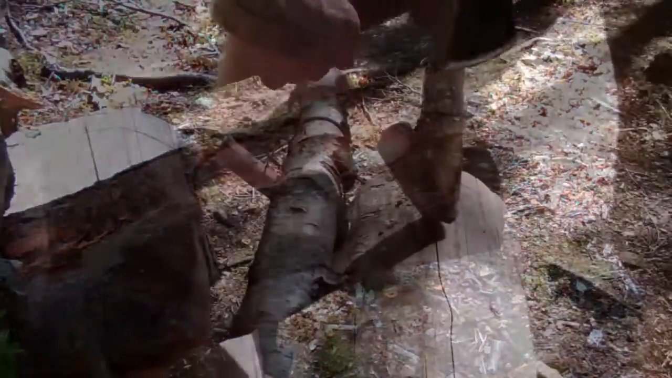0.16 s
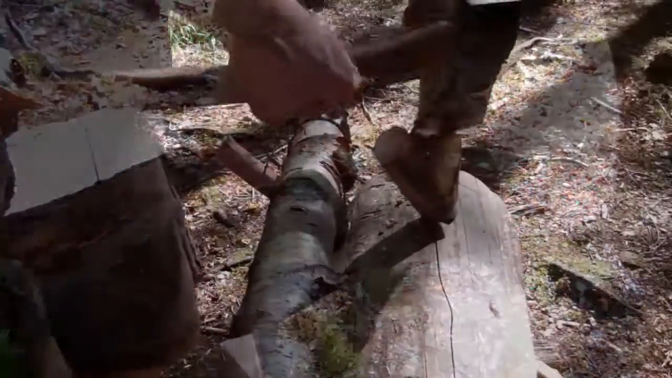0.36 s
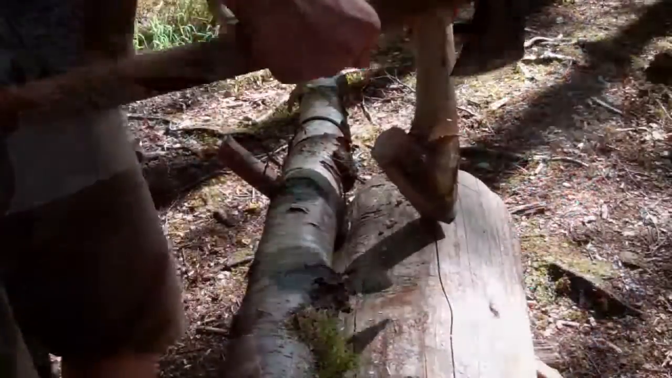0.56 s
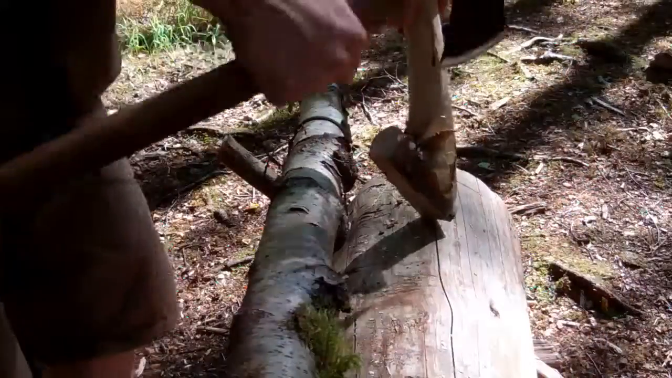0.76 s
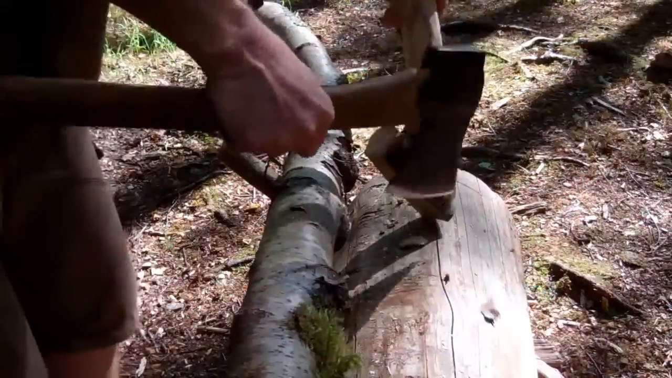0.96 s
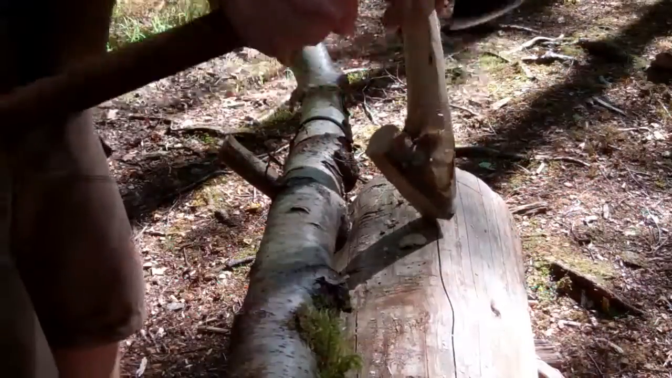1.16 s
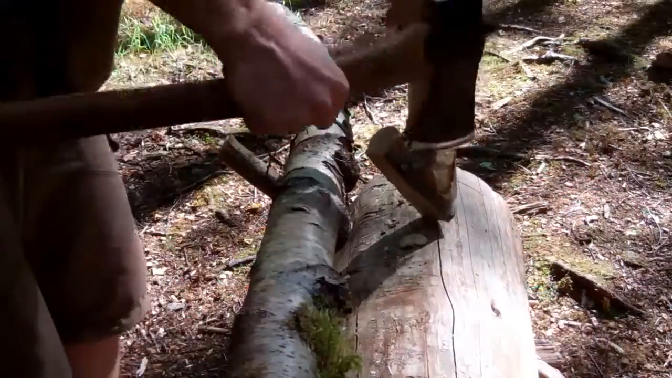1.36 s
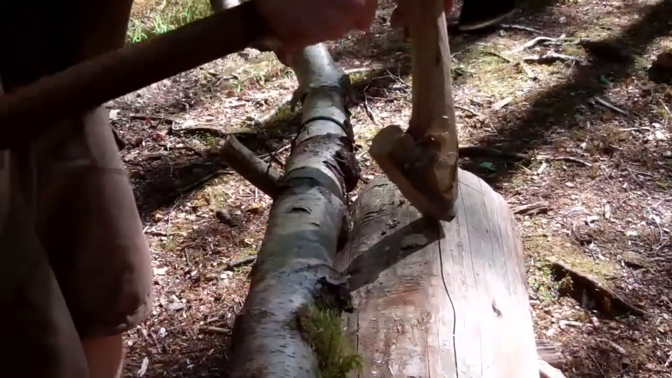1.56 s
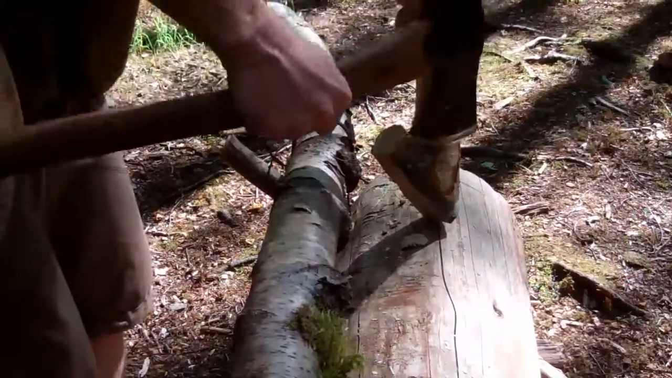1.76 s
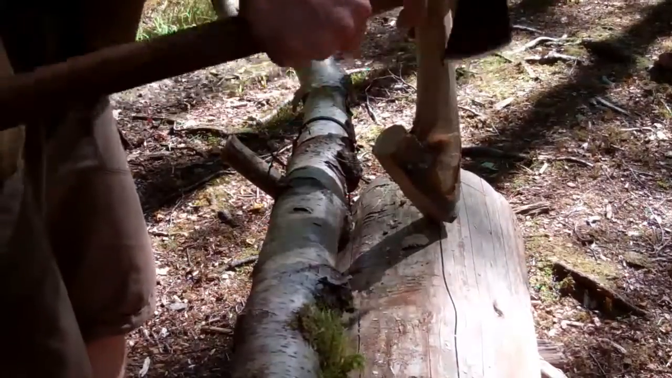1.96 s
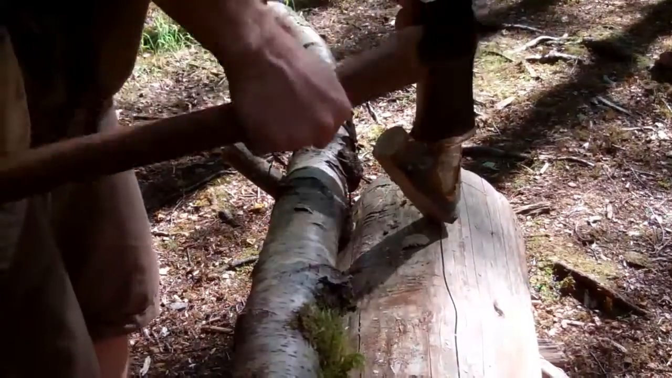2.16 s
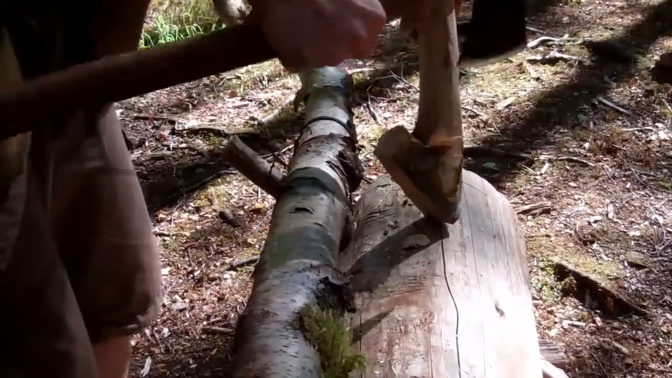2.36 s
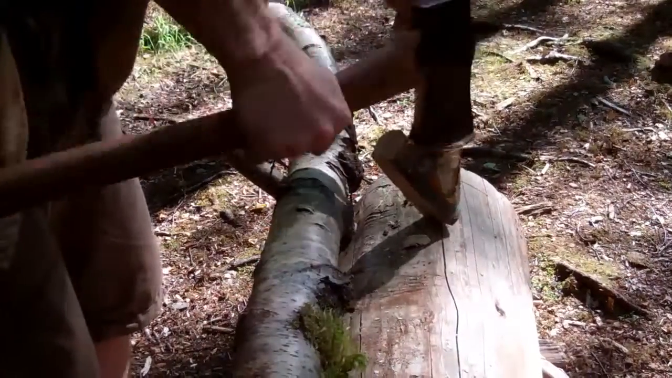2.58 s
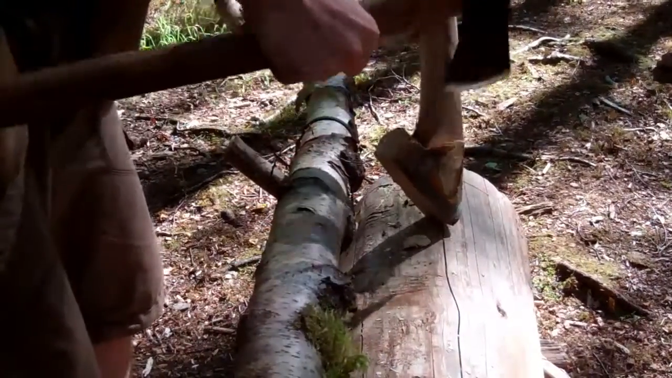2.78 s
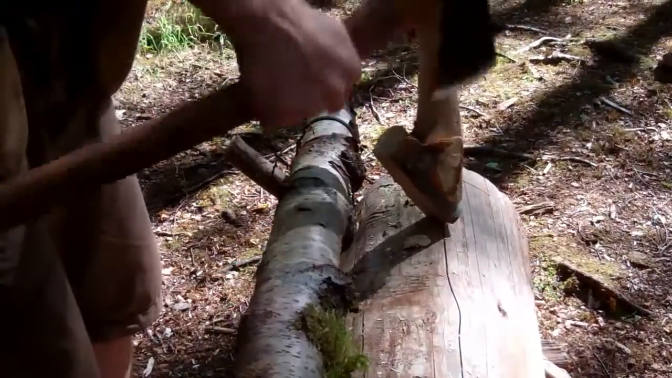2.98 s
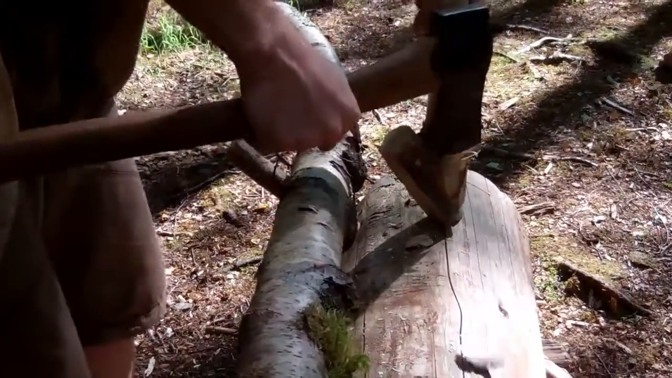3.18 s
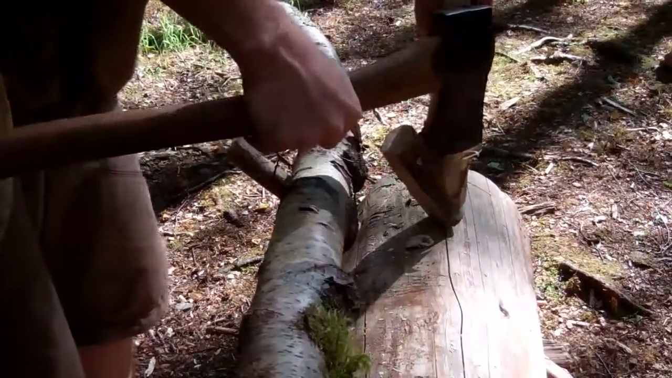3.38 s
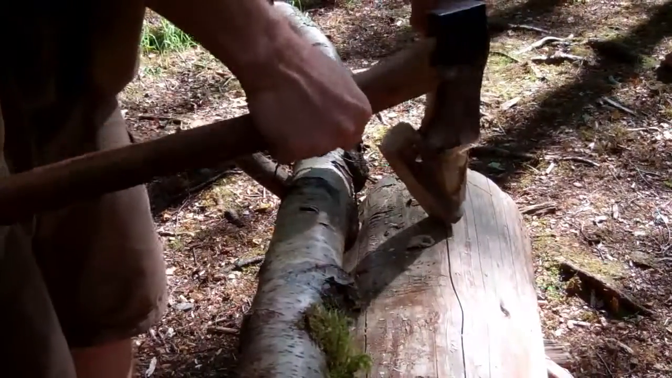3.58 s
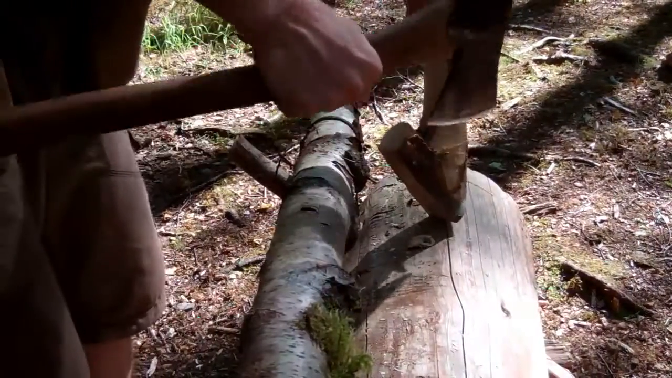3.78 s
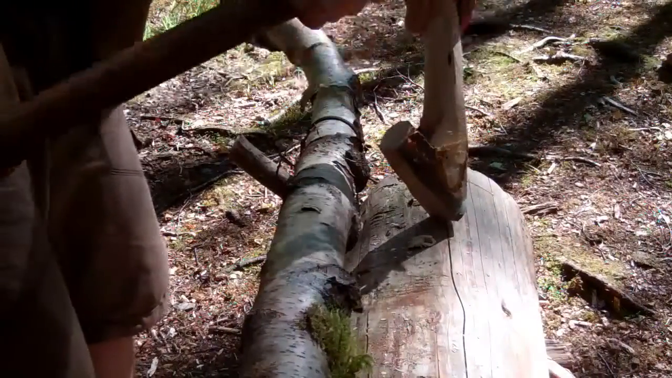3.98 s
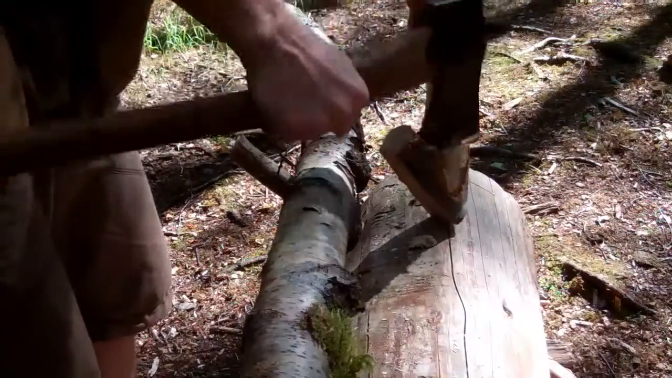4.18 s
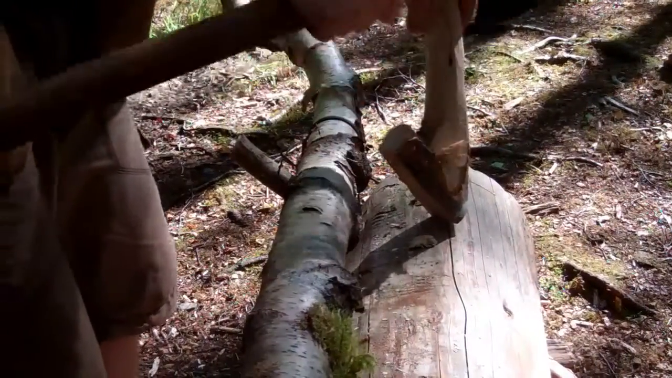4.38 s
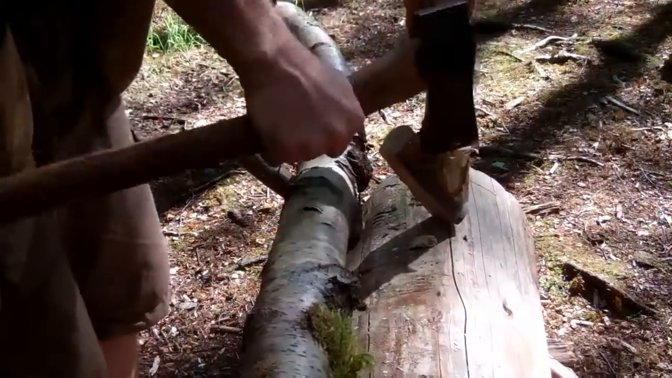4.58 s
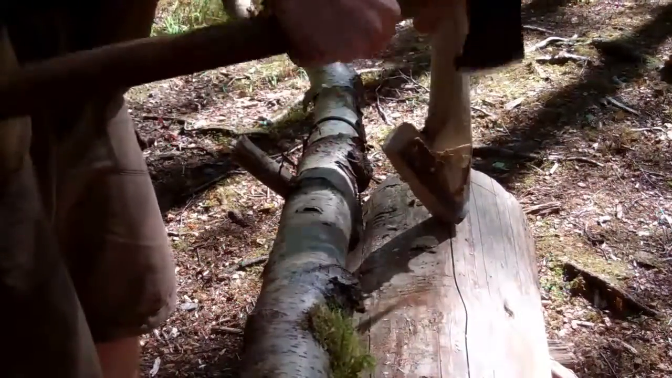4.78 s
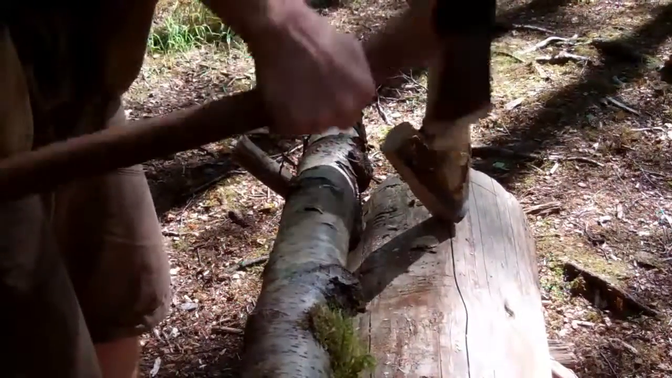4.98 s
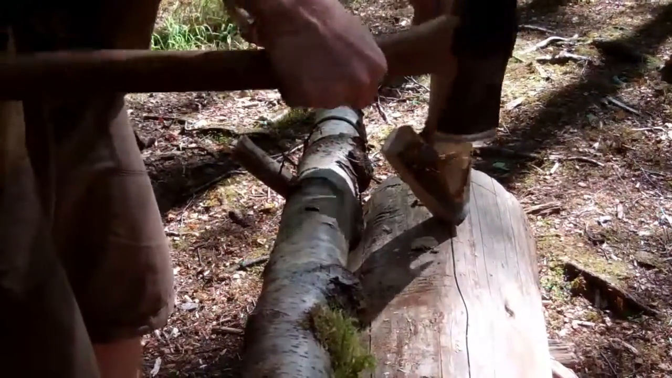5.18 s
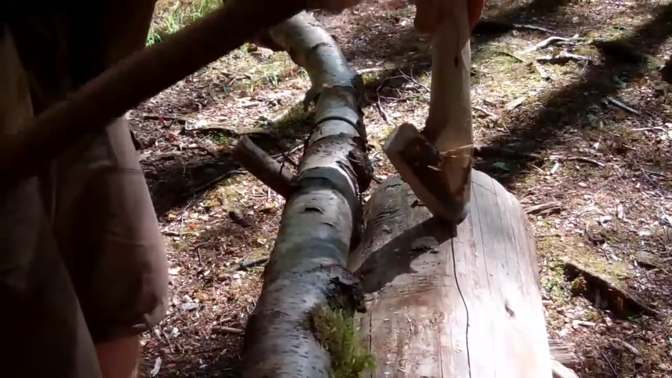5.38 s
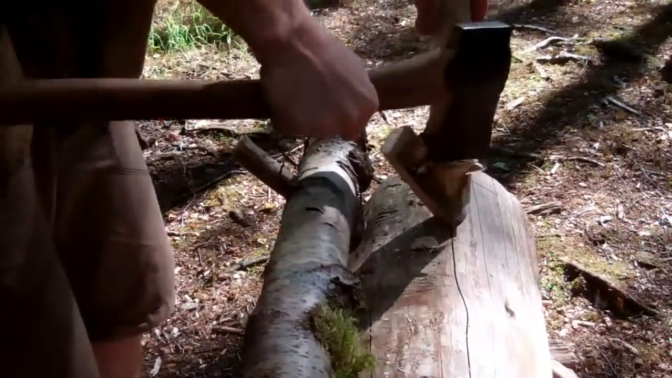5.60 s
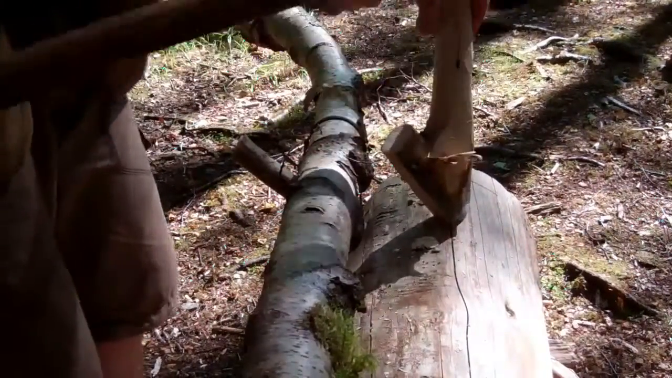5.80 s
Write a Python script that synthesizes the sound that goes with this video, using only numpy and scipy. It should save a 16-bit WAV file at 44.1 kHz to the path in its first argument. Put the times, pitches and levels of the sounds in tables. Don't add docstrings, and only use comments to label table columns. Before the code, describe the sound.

The back of an axe head drives a wooden handle standing on a log, close and slightly left of a stereo microphone. Softer first hits grow into hard dry cracks about every half second, with one longer gap midway. Each has a clipped woody ring and low thud; tiny chips tick between. Soft leaf hiss sinks after blows and swells back.

```python
import sys
import numpy as np
from scipy import signal
from scipy.fft import irfft
from scipy.io import wavfile
from scipy.ndimage import uniform_filter1d

SR = 44100
rng = np.random.default_rng(int(sys.argv[2]) if len(sys.argv) > 2 else 0)


def to_wav(sig):
    pcm = np.clip(np.atleast_2d(sig), -1, 1) * 32767
    pcm = np.round(pcm).astype(np.int16)
    wavfile.write(sys.argv[1], SR, pcm.T)


def volts(x):
    e = np.asarray(x, float) / 20
    return 10 ** e


N = 257544


def evened(x):
    return x / np.sqrt(np.mean(x ** 2) + 1e-20)


def read(points, hz):
    f, value = np.transpose(points)
    return np.interp(np.log(hz + 1), np.log(f + 1), value)


def add(mix, s, sound):
    part = mix[round(s * SR):][:len(sound)]
    part += sound[:len(part)]


def resonate(x, hz, width):
    turn = np.exp(2j * np.pi * np.cumsum(hz * np.ones(len(x))) / SR)
    r = np.exp(-np.pi * width / SR)
    return 2 * (turn * signal.lfilter([1 - r], [1, -r], x / turn)).real


def rise(t, rise_s):
    return np.minimum(t / rise_s, 1)


def ring(t, hz, db, t60):
    return volts(db - 60 * t / max(t60, .001)) * np.sin(2 * np.pi * hz * t)


def burst(db, hz, t60, width, grit_db, rise_s):
    t = np.arange(3000) / SR
    grit = rng.standard_normal(3000) * volts(grit_db * rng.standard_normal(3000))
    fall = volts(db - 60 * t / max(t60, .002)) * rise(t, rise_s)
    return evened(resonate(resonate(grit, hz, width), hz, width)) * fall


# time in seconds, strength in dB
BREEZE = [(0, 2.5), (.12, 4.5), (0.301, 2.5), (.47, 0.5), (0.601, 4.5), (.69, 1.5), (0.82, 3), (1.1, 0),
          (1.3, 1), (1.598, 0.5), (2.5, .5), (3.299, 1), (3.44, 1.5), (3.53, 2), (3.62, 1), (3.76, 2.5),
          (3.9, .5), (4.08, 1), (4.5, 0), (5.83, 0.5)]


def breeze_db():
    return np.interp(np.arange(N) / SR, *np.transpose(BREEZE))


# free ringing in seconds, gain control depth in dB, sinking time in seconds
AFTER_BLOW = [(0.009, 5.5, 0.086), (0.0035, 4.5, 0.28), (0.0017, 20, 0.15), (0.0036, 12.5, 0.13),
              (0.0069, 10.5, 0.17), (0.012, 14, .135), (0.0038, 12, 0.15), (0.0028, 22.5, 0.17),
              (0.0042, 10.5, .157), (0.0073, 19.5, 0.16), (0.0016, 13, .115), (0.0076, 20, 0.16)]


def ducking_db():
    recover_s, sink_curve = 0.15, 0.65
    t, out = np.arange(N) / SR, np.zeros(N)
    for (s, *_), (_, depth_db, sink_s) in zip(BLOWS, AFTER_BLOW):
        sink = (t / sink_s) ** sink_curve
        climb = np.exp(np.minimum(sink_s - t, 0) / recover_s)
        add(out, s, -depth_db * np.minimum(sink, climb))
    return uniform_filter1d(out, size=1300)


# frequency in Hz, density in dB per Hz
FOREST_SPECTRUM = [(41, -28), (70, -1.5), (300, -5), (850, -3.5), (1600, -8), (8090, -17.5), (11500, -25.5),
                   (16000, -61)]
# frequency in Hz, share from 0 to 1
FOREST_LIKENESS = [(60, 0.19), (950, 0.4), (15000, 0.033)]
# frequency in Hz, left over right in dB
FOREST_PAN = [(60, 4), (240, 4), (950, 3.0), (3770, 3.5), (15000, 6)]


def forest():
    rest_db, whine_hz, whine_db = -60, 7865, -18
    rustle_per_db, rustle_ducked = 1.45, -0.025
    air_hz, air_per_db, air_rest_db = 10500, 5, 1.3
    frames, hz = N // 128 + 9, np.fft.rfftfreq(512, 1 / SR)
    breeze, ducked = breeze_db(), ducking_db()
    at = np.minimum(np.arange(frames) * 128, N - 1)
    a, b, c, d, patches = rng.standard_normal((frames, 257, 5)).T
    patches = evened(uniform_filter1d(uniform_filter1d(patches, 6, 0), 16, 1))
    flicker = evened(uniform_filter1d(rng.standard_normal(frames), 3))
    treble = np.clip(np.log2((hz + 1) / 2000), 0, 1)[:, None]
    rustle = treble * (rustle_per_db * breeze - rustle_ducked * ducked)[at]
    air = np.clip(np.log2((hz + 1) / air_hz), 0, 1)[:, None]
    hiss = air * air_per_db * (breeze[at] - air_rest_db)
    same = np.clip(read(FOREST_LIKENESS, hz), -1, 1)[:, None]
    left = a + 1j * b
    right = same * left + np.sqrt(1 - same ** 2) * (c + 1j * d)
    level_db = read(FOREST_SPECTRUM, hz)[:, None] + 2.0 * patches + 1.1 * flicker + rustle + hiss
    z = np.array([left, right]) * volts(level_db)
    z *= volts(np.outer([.5, -.5], read(FOREST_PAN, hz)))[:, :, None]
    wash = evened(signal.istft(z, nperseg=512, noverlap=384)[1][:, :N])
    whine = np.array([evened(resonate(row, whine_hz, 40)) for row in rng.standard_normal((2, N))])
    return volts(rest_db + 3 + breeze + ducked) * (wash + volts(whine_db) * whine)


# start and end in seconds, start and end pitch in Hz, level in dB, width in Hz
BIRDS = [
    (1.155, 1.345, 8640, 8480, -66.5, 90),
    (1.175, 1.335, 7630, 7540, -68, 130),
    (3.66, 3.81, 1960, 1890, -63.5, 110),
    (1.6, 1.73, 1850, 1880, -73, 110),
]


def birds():
    arch, blur = .006, .8
    out = np.zeros(N)
    for s, end, hz, end_hz, db, width in BIRDS:
        size = round((end - s) * SR)
        swell = np.sin(np.linspace(0, np.pi, size))
        glide = np.linspace(hz, end_hz, size) * (1 - arch + arch * swell)
        breath = evened(resonate(rng.standard_normal(size), glide, width))
        note = blur * breath + np.sin(2 * np.pi * np.cumsum(glide) / SR)
        add(out, s, volts(db) * evened(note) * np.sqrt(swell))
    return out


# time in seconds, boom in dB, boom pitch in Hz, shake in dB
SHAKES = [(0.333, -36.5, 280, -46), (0.854, -36.5, 251, -68), (1.352, -31.5, 410, -52),
          (1.755, -25.5, 194, -46), (2.169, -30.5, 321, -52), (2.61, -24.5, 221.3, -47.5),
          (3.05, -36.5, 231, -60), (4.127, -23.5, 290, -51.5), (4.59, -42.5, 290, -68),
          (5.039, -46, 118, -57), (5.513, -34.5, 228, -69)]


def shakes():
    out, t = np.zeros(N), np.arange(9000) / SR
    for s, _, _, db in SHAKES:
        add(out, s + 0.0078, ring(t, 47 * rng.uniform(.92, 0.94), db, 0.2) * rise(t, 0.014))
    noise = rng.standard_normal((2, N))
    rumble = np.array([evened(resonate(resonate(row, 46, 35), 46, 35)) for row in noise])
    return out + volts(-71.5 + 1.2 * ducking_db()) * rumble


# frequency in Hz, 60 dB decay in seconds
TRUNKS = [(200, 0.27), (2000, 0.13), (12000, 0.05)]


def trunks(x):
    taps = np.zeros((2, 16000))
    at = np.arange(300, 15960, 20) + rng.integers(0, 20, (2, 783))
    np.put_along_axis(taps, at, rng.choice([-1., 1.], at.shape), 1)
    hz, t, z = signal.stft(taps, SR, nperseg=256)
    tail = signal.istft(z * volts(-60 * t / read(TRUNKS, hz)[:, None]), SR, nperseg=256)[1]
    return signal.fftconvolve(x[None], tail / np.linalg.norm(tail[0]), axes=1)[:, :N]


def tick(db, hz, treble_db, treble_hz):
    t = np.arange(3000) / SR
    blip = ring(t, hz, db - 1.5, min(.016, .014 * (1400 / hz) ** 2)) * rise(t, .0006)
    body = ring(t, .5 * hz, db - 16.5, 0.012)
    tap = burst(.5 * (db + treble_db) - 4.5, 2000, 0.05, 4100, 1.9, 0.00082)
    puff = burst(treble_db + 2.5, treble_hz, 0.016, 6000, 2.0, 0.0016)
    return blip + body + tap + puff


# time in seconds, near echoes in dB, far echo in dB
ECHOED = [(0.342, -56, -40), (1.346, -51.5, -60), (1.757, -42, -57), (2.173, -47, -52), (2.612, -46, -38),
          (3.053, -57, -41.5), (4.133, -46, -46), (4.596, -55, -43), (5.042, -58, -36), (5.521, -65, -41)]
# level in dB, pitch in Hz, treble in dB, treble pitch in Hz
NEAR_TRUNKS = [
    (-4, 780, 0.5, 8800),
    (-4, 1470, -9.5, 8600),
    (-9, 1190, -16.5, 4000),
]
# level in dB, pitch in Hz, treble in dB, treble pitch in Hz
FAR_TRUNK = (-9, 1262, -13.5, 5495)
TRUNK_DELAYS = [.032, .075, .123, .245]


def trunk_echoes():
    out = np.zeros(N)
    for s, near_db, far_db in ECHOED:
        levels = [near_db, near_db, near_db, far_db]
        for delay, level_db, trunk in zip(TRUNK_DELAYS, levels, NEAR_TRUNKS + [FAR_TRUNK]):
            db, hz, treble_db, treble_hz = trunk
            add(out, s + delay, tick(level_db + db, hz, level_db + treble_db, treble_hz))
    return out


# time in seconds, peak in dB, pitch in Hz, treble in dB
CHIPS = [(0.104, -37, 3300, -52), (0.111, -50, 1950, -45.5), (0.425, -33.5, 1970, -73),
         (0.9189, -69, 2350, -52), (0.949, -48, 1980, -67), (1.485, -65, 3000, -58), (1.685, -54, 920, -62),
         (.462, -43, 1910, -75), (1.913, -57, 1460, -68), (2.214, -58, 3450, -48), (2.28, -50, 2120, -88),
         (2.436, -56, 2690, -47.5), (2.679, -40.5, 2050, -65), (2.695, -46, 2030, -70),
         (2.72, -50, 2070, -90), (2.842, -44, 1950, -73), (2.965, -51, 1240, -70), (3.116, -53, 977, -68),
         (3.243, -68, 2950, -56.5), (3.283, -52, 1800, -74), (3.57, -65, 950, -49.5),
         (3.724, -59, 1880, -55), (3.755, -62, 3300, -50), (4.194, -43.5, 2000, -60),
         (4.288, -54, 1510, -64), (4.651, -56, 2360, -63), (5.1, -44, 2160, -63), (5.151, -51, 2180, -78),
         (5.188, -46, 2000, -74), (5.571, -62, 1500, -66)]


def chips():
    out = np.zeros(N)
    for s, *row in CHIPS:
        add(out, s, tick(*row, 6800))
    return out


# time in seconds, level in dB, pitch in Hz
SPLINTERS = [(.374, -52.5, 2800), (.394, -49, 1500), (1.068, -63.5, 7000), (1.131, -65.5, 8500),
             (1.422, -54, 2800), (1.423, -69, 4500), (1.447, -74, 1200), (1.718, -49, 5470),
             (1.816, -56, 1600), (1.856, -63, 1500), (2.001, -62, 1300), (2.241, -58, 2000),
             (2.269, -59, 1300), (2.269, -67, 5500), (2.318, -58, 7500), (2.324, -56.5, 7500),
             (2.343, -65, 1000), (2.417, -56, 1000), (2.709, -58.5, 1500), (2.708, -69, 5000),
             (2.857, -45, 785), (3.063, -47, 9500), (3.136, -65, 1980), (3.16, -65, 2030),
             (3.209, -68, 1960), (3.424, -55.5, 7000), (3.503, -58, 4500), (3.778, -53, 4970),
             (4.164, -62, 4500), (4.189, -57, 4500), (4.227, -58, 1600), (4.238, -63, 1800),
             (4.658, -62.5, 1490), (4.689, -62.5, 1000), (4.701, -64, 1990), (4.741, -75, 8500),
             (4.748, -71, 8200), (4.749, -71, 2800), (5.096, -58, 8000), (5.1, -56, 2800),
             (5.124, -58, 1990), (5.176, -54, 2000), (5.213, -61, 8000), (5.286, -48, 1300),
             (5.572, -72, 8200), (5.581, -64, 1210), (5.627, -63, 2000), (5.643, -70, 4470),
             (5.665, -67.5, 2006), (5.697, -68, 1000)]


def splinters():
    out = np.zeros(N)
    for s, db, hz in SPLINTERS:
        add(out, s, burst(db + 2.5, hz, 0.014, 0.69 * hz, 1.2, 0.00098))
    return out


def booms():
    out, t = np.zeros(N), np.arange(7000) / SR
    for s, db, hz, _ in SHAKES:
        beat = 1 + 0.14 * np.cos(2 * np.pi * 0.22 * hz * t)
        add(out, s, ring(t, hz, db + 0.5, 0.035) * beat * rise(t, 0.0058))
    return out


# frequency in Hz, level in dB, 60 dB decay in seconds
LOG_MODES = [(400, -0.5, 0.0028), (520, -14.5, 0.043), (594.4, 0, 0.033), (780, 2.5, 0.031),
             (1053, 6.5, 0.031), (1171, -3, 0.024), (1368, 5.5, 0.051)]


def thud(db, hz, t60):
    t, body = np.arange(3000) / SR, 0
    for f, d, s in LOG_MODES:
        near_db = d - 14 * np.log2(f / hz) ** 2
        body = body + ring(t, f * rng.uniform(0.92, 1.02), near_db, s * t60 / 0.032)
    push = burst(db - 6.5, hz, 0.76 * t60, 1.0 * hz, 8.2, 0.00011)
    return push + volts(db - 2.5) * body * rise(t, 0.001)


# time in seconds, level in dB, pitch in Hz, 60 dB decay in seconds
THUDS = [(.331, -39, 700, 0.057), (.336, -59, 790, 0.046), (.851, -44.5, 800, 0.036),
         (.86, -47, 826, 0.017), (1.35, -40.5, 700, 0.06), (1.354, -56, 553, 0.046),
         (1.758, -35, 620, 0.014), (1.7615, -30, 566, 0.035), (2.1726, -25.5, 443, 0.029),
         (2.612, -31.5, 700, 0.051), (2.616, -38, 700, 0.03), (3.051, -36, 520, 0.03),
         (4.1268, -27, 580, .025), (4.1333, -29.5, 490, 0.032), (4.591, -23, 637, 0.023),
         (4.597, -35, 594, 0.029), (5.039, -42, 670, 0.025), (5.511, -27.5, 822, 0.014),
         (5.516, -38, 502, 0.033)]


def thuds():
    out = np.zeros(N)
    for s, *row in THUDS:
        add(out, s, thud(*row))
    return out


# time in seconds, pitch in Hz,
# level in dB, 60 dB decay in seconds
RINGS = [(.331, 660, -27, .033), (.853, 5200, -26, .022), (.875, 5400, -44, .08), (.8911, 2420, -33.5, .02),
         (.925, 5400, -69, .15), (.94, 11350, -75, .2), (1.348, 680, -29, .015), (1.747, 5620, -29, .034),
         (3.047, 1163, -24.5, .0073), (4.1268, 660, -18.5, .011), (5.035, 1795, -14.5, .013),
         (.921, 2400, -60, .17), (.921, 6000, -70, .13), (.891, 5400, -45, .035), (.891, 1150, -47, .02),
         (4.132, 1170, -33, .07),
    (4.592, 1170, -35, .055),
    (5.512, 1170, -36.5, .07),
         (.335, 915, -42, 0.064), (.335, 2070, -38.5, 0.045), (.335, 2850, -44, 0.032),
          (.335, 2300, -56, .045), (1.354, 450, -34, 0.033), (1.354, 820, -48, 0.069),
          (1.354, 2320, -43.5, 0.041), (1.353, 2950, -45, 0.028), (1.757, 592, -30, 0.041),
          (1.757, 903, -34, 0.037), (1.757, 1146, -36, 0.053), (1.757, 2370, -30, 0.036),
          (2.172, 454, -37.5, 0.04), (2.175, 1180, -36.5, 0.046), (2.173, 1450, -43, 0.02),
          (2.173, 2870, -41, 0.047), (2.612, 624, -33, 0.041), (2.613, 1180, -41.5, 0.046),
          (2.614, 1470, -33.5, 0.03), (2.611, 2500, -33.5, 0.043), (3.051, 575, -36.5, 0.022),
          (3.051, 987, -57, 0.026), (3.05, 1580, -42.5, 0.031), (3.051, 3420, -42, .027),
          (4.133, 603, -50, 0.052), (4.133, 1430, -42.5, 0.067), (4.134, 1740, -43, .047),
          (4.594, 575, -48, 0.031), (4.594, 995, -31, 0.024), (4.593, 3170, -40.5, 0.032),
          (5.039, 530, -43, 0.044), (5.038, 1163, -38.5, 0.02), (5.04, 1490, -48.5, 0.028),
          (5.04, 2051, -52, 0.028), (5.04, 3000, -48, 0.021), (5.516, 523, -34.5, 0.023),
          (3.0484, 5830, -26, .01), (.331, 3480, -29, 0.0079), (2.167, 4000, -27, 0.011),
          (5.515, 2051, -49.5, 0.031), (5.516, 3040, -45, 0.036)]


def rings():
    out, t = np.zeros(N), np.arange(7000) / SR
    for s, *row in RINGS:
        add(out, s, ring(t, *row) * rise(t, 0.00065))
    return out


# time in seconds, level in dB, pitch in Hz, 60 dB decay in seconds
KNOCKS = [(0.325, -40.5, 2470, 0.083), (0.85, -31.5, 2200, 0.0058), (0.8592, -32.5, 2920, 0.022),
          (0.865, -42, 1990, 0.017), (0.8915, -35, 2360, 0.01), (1.342, -45.5, 2380, 0.022),
          (1.352, -27.5, 2550, 0.016), (1.7585, -29.5, 3150, 0.03), (2.1728, -23, 2360, 0.015),
          (2.6106, -21, 2770, 0.02), (3.051, -39, 2590, 0.023), (4.128, -18, 2600, 0.017),
          (4.13, -32.5, 2740, 0.033), (4.59, -25, 3020, 0.015), (4.594, -67, 2570, 0.019),
          (4.6001, -35.5, 3370, 0.019), (5.0397, -31.5, 3530, 0.015), (5.516, -31, 2460, 0.018)]


def knocks():
    out = np.zeros(N)
    wood = signal.butter(3, 8000, fs=SR, output="sos")
    for s, db, hz, t60 in KNOCKS:
        add(out, s, signal.sosfilt(wood, burst(db - 1.5, hz, t60, .9 * hz, 2.2, .0003)))
    return out


# time in seconds, level in dB, pitch in Hz, 60 dB decay in seconds, width in Hz
CHATTER = [
    (.862, -39, 2200, 0.074, 600),
    (.9, -77, 2420, .3, 400),
    (.912, -69, 2300, 0.35, 500),
    (.915, -63, 5560, 0.12, 900),
]


def chatter():
    out = np.zeros(N)
    for s, db, hz, t60, width in CHATTER:
        add(out, s, burst(db, hz, t60, width, 2, .002) * signal.windows.tukey(3000, .5))
    return out


# time in seconds, level in dB, pitch in Hz
CRACKS = [(0.3251, -45, 8500), (0.3311, -38, 5770), (0.3388, -51.5, 6040), (0.8505, -27, 6970),
          (0.853, -22, 6050), (0.86, -31, 8540), (0.867, -41.5, 9000), (0.8726, -44, 9000),
          (0.877, -52.5, 6600), (0.8885, -52, 5770), (1.3482, -25.5, 7500), (1.3516, -29, 7700),
          (1.7475, -32.5, 8000), (1.7568, -27.5, 7400), (1.7623, -45.5, 5950), (2.1655, -24.5, 5800),
          (2.1735, -29.5, 7000), (2.6039, -24.5, 6000), (2.6107, -26.5, 6370), (3.0486, -24, 6080),
          (3.0514, -29, 7040), (4.1265, -32, 5740), (4.1276, -23.5, 5970), (4.13, -29, 7000),
          (4.5833, -27, 6100), (4.592, -31.5, 7470), (4.6006, -35, 6820), (5.0349, -27.5, 5260),
          (5.0388, -33.5, 7000), (5.5103, -26.5, 6410), (5.515, -29.5, 7100)]


def cracks():
    out = np.zeros(N)
    for s, db, hz in CRACKS:
        t60 = 0.012 * volts(-0.34 * (db + 24.5))
        add(out, s, burst(db + 3, hz, t60, .45 * hz, 2.3, .0005))
    return out


# time in seconds,
# pitch in Hz, level in dB, 60 dB decay in seconds
CLICKS = [(.3301, 10200, -33.5, 0.0047), (0.3298, 5500, -33.5, 0.0056), (.8598, 9300, -24, .005),
          (.8677, 9000, -37.5, 0.0036), (.8724, 8900, -38, 0.0044), (1.3467, 1800, -32, .008),
          (1.3498, 6000, -32, .035), (1.349, 8900, -28, .012), (1.7569, 7000, -24, .006),
          (2.1683, 5800, -31, .02), (2.1728, 5000, -26, .003), (2.6116, 4100, -16, .003),
          (2.6075, 5800, -33, .012), (3.051, 7000, -23, .005), (3.0535, 6900, -29, .008),
          (3.054, 9300, -32, .008), (4.1272, 1720, -31, .035), (4.1272, 980, -30, .025),
          (4.5899, 8000, -20, .0035), (4.6011, 6500, -20, .006), (4.5853, 5900, -31, .01),
          (5.0386, 8200, -21, .005), (5.0395, 9200, -30, .03), (5.5104, 7000, -22, .009),
          (5.5159, 7800, -27, .007), (4.128, 5820, -20.5, .012), (5.5101, 933, -23.5, 0.011),
          (.331, 860, -32, 0.024), (4.1261, 3290, -18, .003), (1.349, 2500, -25, 0.013),
          (4.591, 3000, -23, 0.019)]


def clicks():
    out, t = np.zeros(N), np.arange(7000) / SR
    for s, *row in CLICKS:
        add(out, s, ring(t, *row) * rise(t, .0003))
    return out


# time in seconds, level in dB
SNAPS = [
    (.8503, -46),
    (1.7469, -38),
    (2.6044, -45),
    (4.6009, -42),
    (5.0344, -43),
    (5.5098, -37),
    (.8598, -44),
    (4.1272, -50),
]


def snaps():
    out = np.zeros(N)
    for s, db in SNAPS:
        add(out, s, burst(db, 15000, .004, 2500, 1.5, .0002))
    return out


# frequency in Hz, level in dB, 60 dB decay in seconds
STEEL_MODES = [
    (5770, -30, 0.036),
    (6600, -35, 0.0099),
    (1065, -27, 0.038),
]


def blow(db, bite_hz, ring_hz, ring_db, free_s):
    t = np.arange(2000) / SR
    bite = ring(t, bite_hz, 7.43, 0.0034)
    bite += ring(t, 0.67 * bite_hz, 0.1, 0.005)
    bite += ring(t, 1.3 * bite_hz, -9.0, 0.0052)
    bite += ring(t, 700 * rng.uniform(0.63, 1.3), -23.5, 0.025)
    modes = ring(t, ring_hz, ring_db, 0.049)
    for f, d, t60 in STEEL_MODES:
        modes += ring(t, f * rng.uniform(1.0, 1.03), d, t60)
    damped = volts(-3000 * np.maximum(t - free_s, 0)) * rise(t, 0.0033)
    return volts(db) * (bite * rise(t, 0.00043) + modes * damped)


# time in seconds, peak in dB, bite in Hz, handle ring in Hz, ring in dB under the bite
BLOWS = [(0.0163, -37, 2210, 1960, -11), (0.3311, -17.5, 1870, 2650, -2), (0.8519, -32.5, 2040, 1950, 2.5),
         (1.3482, -17.5, 2520, 2560, -16), (1.7474, -12, 1890, 2020, -12.5),
         (2.166, -10.5, 2395, 2390, -18), (2.605, -9.5, 2220, 2400, -10), (3.0475, -8.5, 2454, 2305, -16.5),
         (4.1268, -17.5, 3205, 3010, -10), (4.584, -9, 2370, 2270, -20), (5.0349, -7, 2640, 2440, -12),
         (5.5099, -10.5, 3820, 2924, -20.5)]


def blows():
    bounce_s, bounce_db = 0.000948, -8
    direct = np.zeros(N)
    for (s, *row), (free_s, *_) in zip(BLOWS, AFTER_BLOW):
        add(direct, s, blow(*row, free_s))
    mirror = np.interp(np.arange(N) - bounce_s * SR, np.arange(N), direct)
    return direct + volts(bounce_db) * mirror


# frequency in Hz, left over right in dB
BLOW_PAN = [(60, 2.5), (180, 5), (550, 4), (1650, 3.5), (4970, 7), (8000, 9), (14000, 11)]
# frequency in Hz, lead of the left in radians
BLOW_LEAD = [(100, 0), (3000, 0), (4500, .3), (7150, -.7), (9700, -1.1), (12500, -1.5), (16000, -3)]


def ports(x):
    hz, sides = np.fft.rfftfreq(256, 1 / SR), [.5, -.5]
    gain = volts(np.outer(sides, read(BLOW_PAN, hz))) * np.exp(1j * np.outer(sides, read(BLOW_LEAD, hz)))
    taps = np.roll(irfft(gain), 128, axis=1) * np.hanning(257)[:256]
    return signal.oaconvolve(x[None], taps, axes=1)[:, 128:N + 128]


def scene():
    dull = signal.butter(2, 12500, fs=SR, output="sos")
    bark = signal.butter(2, 7000, fs=SR, output="sos")
    litter = signal.butter(4, 10000, fs=SR, output="sos")
    log = booms() + thuds() + rings()
    handle = knocks() + chatter() + cracks() + clicks()
    axe = signal.sosfilt(dull, blows() + handle + log)
    ticks = signal.sosfilt(litter, trunk_echoes() + chips() + splinters())
    far = (birds() + shakes()) * volts(np.array([[2.], [-2.]]))
    near = ports(axe + ticks) + volts(-46.0) * trunks(signal.sosfilt(bark, axe))
    return near + far + forest() + snaps() * volts(np.array([[1.], [-1.]]))


def top_cut(x):
    return signal.sosfilt(signal.butter(12, 16550, fs=SR, output="sos"), x)


def record(dry):
    top = signal.butter(4, 12600, fs=SR, output="sos")
    return top_cut(signal.sosfilt(top, dry))


dry = scene()
out = record(dry)
to_wav(out)
```